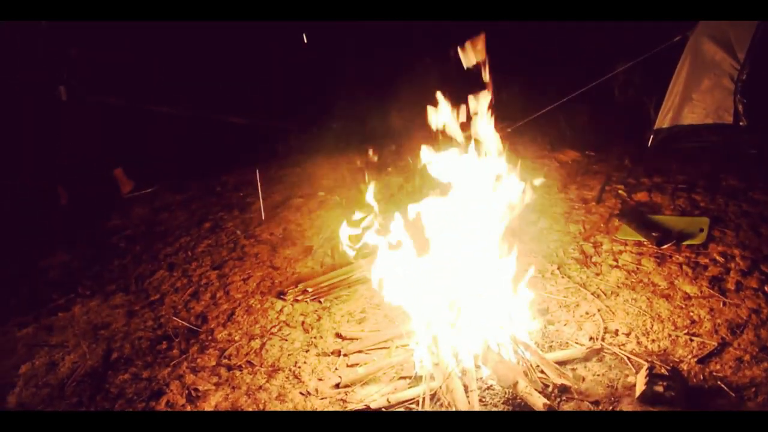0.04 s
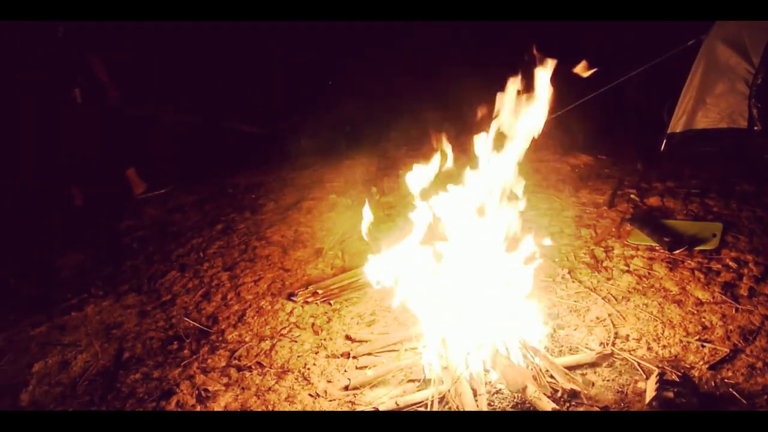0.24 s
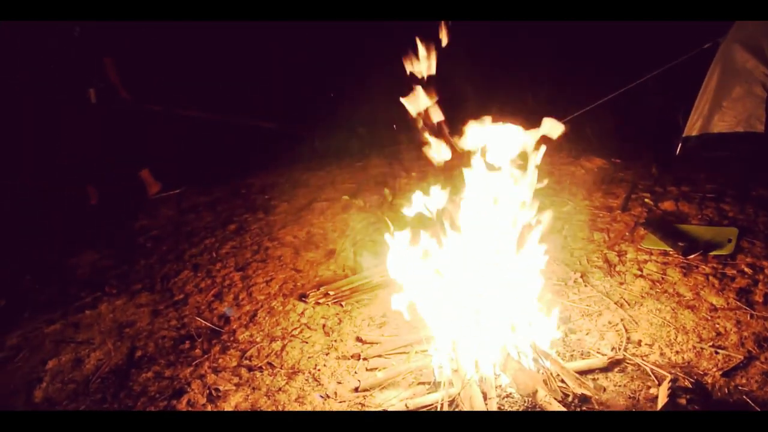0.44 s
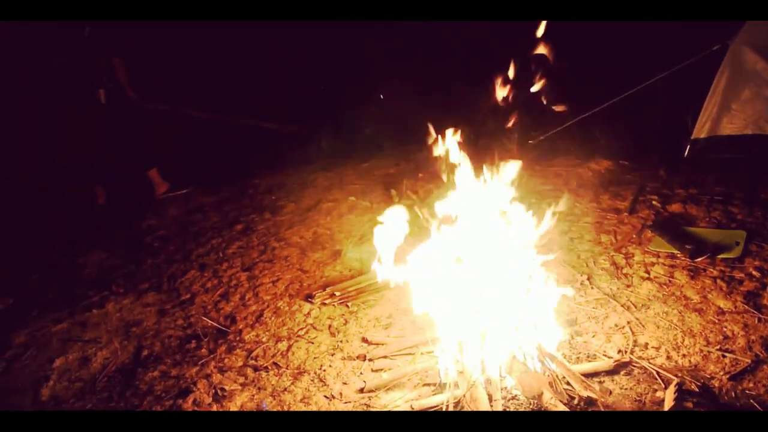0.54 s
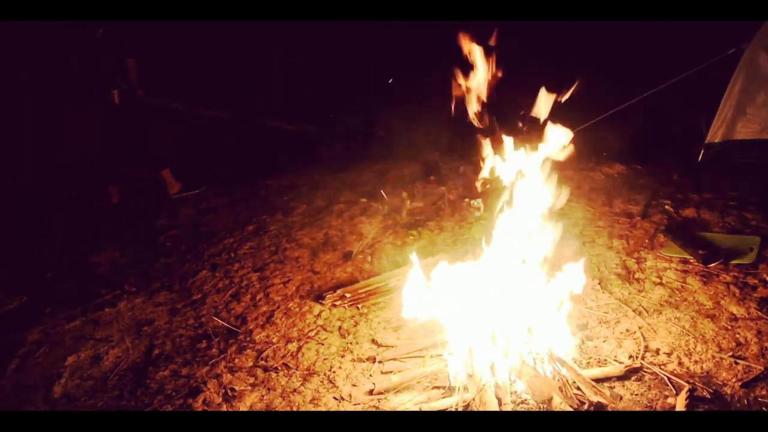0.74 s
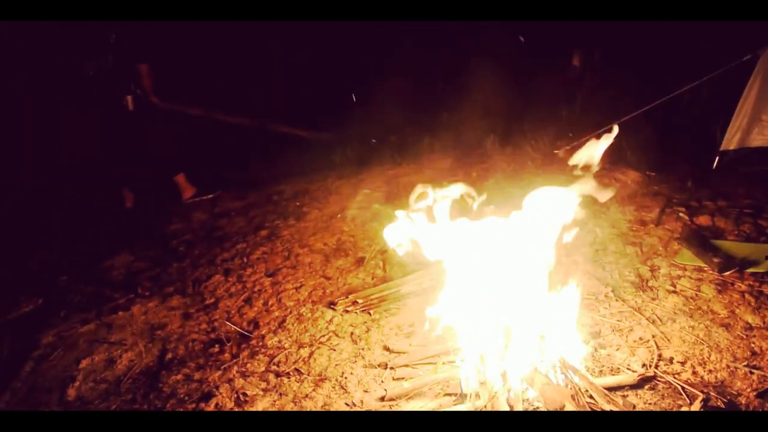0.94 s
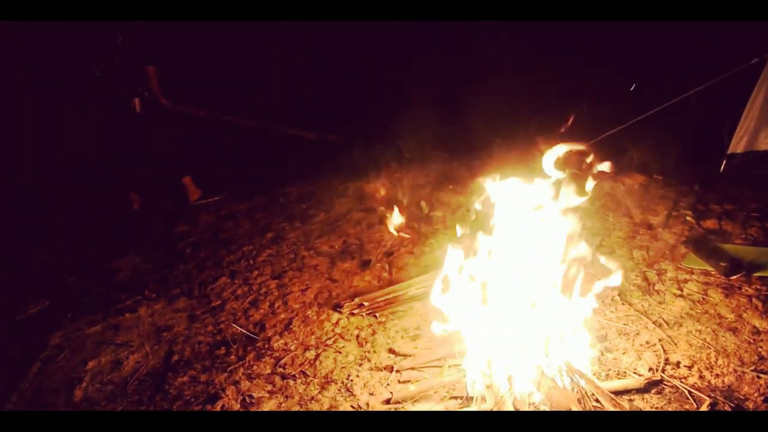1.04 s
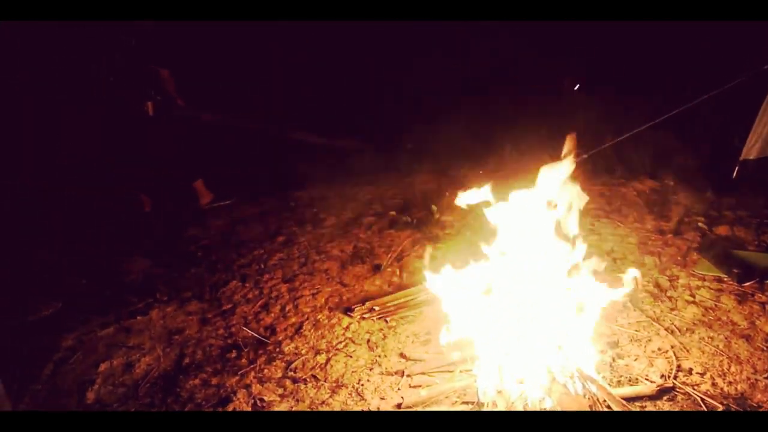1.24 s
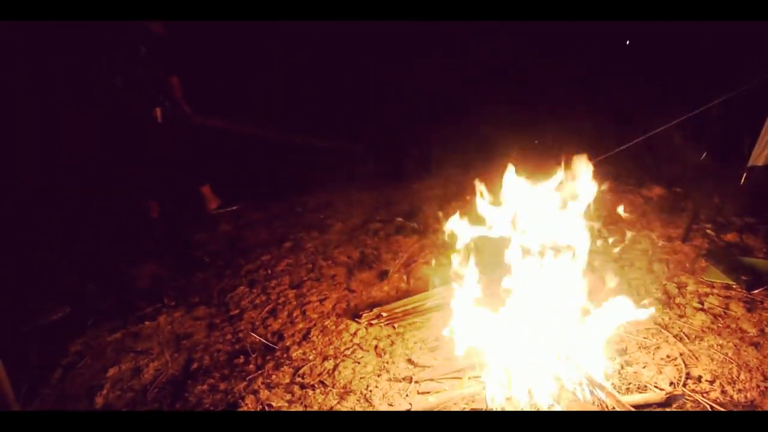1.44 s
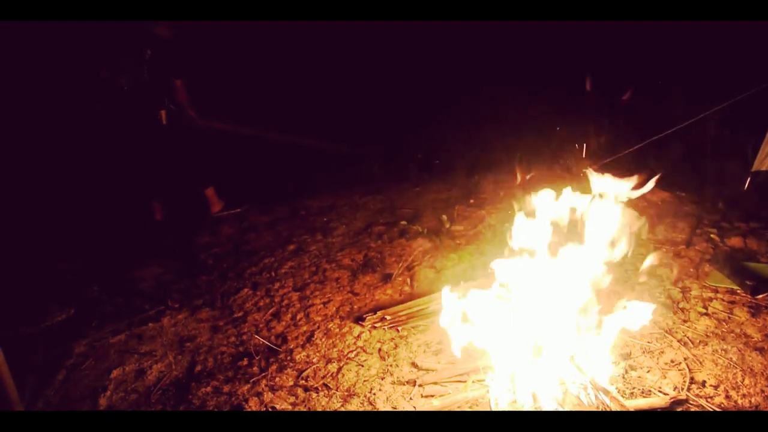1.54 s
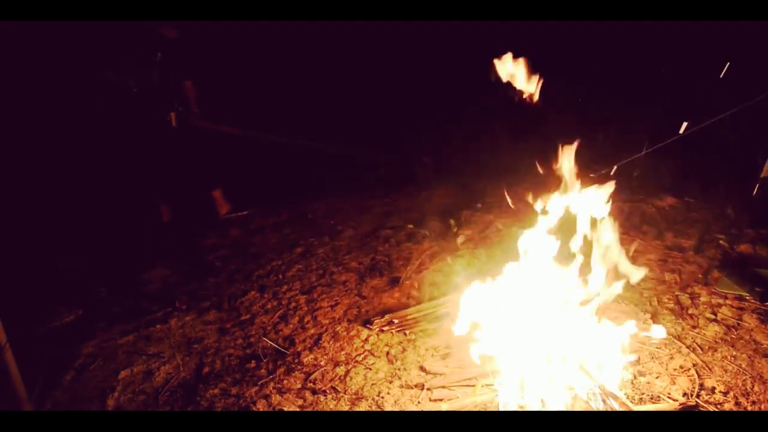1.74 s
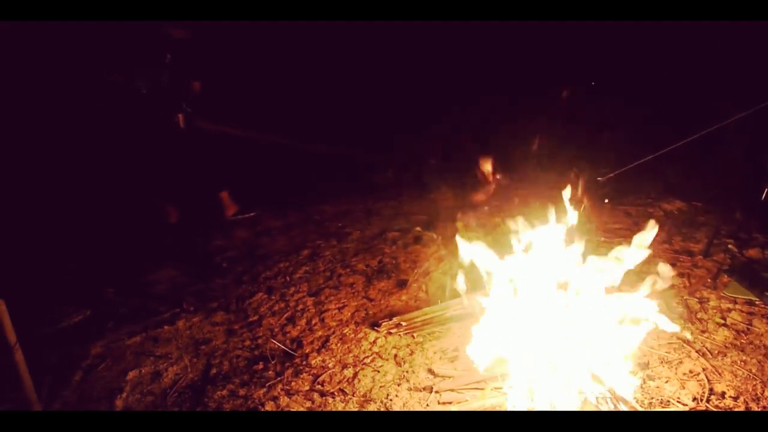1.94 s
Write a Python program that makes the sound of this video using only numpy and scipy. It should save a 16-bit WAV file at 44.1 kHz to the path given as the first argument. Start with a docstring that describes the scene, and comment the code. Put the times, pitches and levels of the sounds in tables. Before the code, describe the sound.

A campfire crackles up close, sap bursting with loud pops and steam spurts, insects trilling faintly behind

```python
"""A campfire at night, close to the microphone: a sap pocket bursts with a loud pop and a jet of steam, another follows.
Each burst or crack is decaying rings and shaped noise; steam, flames and sap hiss are coloured, patchy noise.
Flaring gas puffs, and tiny decaying sines tick through the hiss.
In the dark around the fire a cricket trills as a modulated sine, a chorus of insects swells and sinks
as banded noise, and a small night animal gives falling chirps. A faint noise tail answers the wood."""
import sys
import numpy as np
from scipy import signal
from scipy.fft import rfft, irfft, next_fast_len
from scipy.io import wavfile
from scipy.ndimage import uniform_filter1d, map_coordinates

SR = 44100
rng = np.random.default_rng(int(sys.argv[2]) if len(sys.argv) > 2 else 0)


def materialize(psi):
    """Save the field psi as 16-bit PCM at rate SR to the path in sys.argv[1].

    A 1-D psi becomes a single channel; in a 2-D psi each row is a channel.
    """
    bounded = np.clip(np.atleast_2d(psi).T, -1, 1)
    quanta = np.round(bounded * 32767).astype(np.int16)
    wavfile.write(sys.argv[1], SR, quanta)


N = 88200
T = np.arange(N) / SR
TOP_HZ = 15800  # band limit at the microphone


def amp(db):
    """Turn decibels into an amplitude factor."""
    return 10 ** (np.asarray(db) / 20)


def unit(x):
    """Scale to rms 1."""
    return x / np.sqrt(np.mean(x ** 2) + 1e-20)


def along(points, hz):
    """Read a curve of (Hz, value) points on a log frequency axis."""
    f, value = np.transpose(points)
    return np.interp(np.log(hz + 1), np.log(f + 1), value)


def shape(points):
    """Gain as a function of frequency, from (Hz, dB) points."""
    return lambda hz: amp(along(points, hz))


def band(centre_hz, q):
    """Gain of a resonant band around a centre."""
    return lambda hz: 1 / (1 + (q * (hz / centre_hz - centre_hz / (hz + 1))) ** 2)


def pan(db):
    """Left and right gains that differ by db; positive leans left."""
    return amp(np.array([[.5], [-.5]]) * db)


def fade(t, t60):
    """Exponential decay that loses 60 dB in t60 seconds."""
    return np.exp(-np.log(1000) * t / t60)


def wobble(rate):
    """A smooth random curve, rate knots a second."""
    return map_coordinates(rng.standard_normal(1000), [T * rate + 2], mode="wrap")


def filtered(x, response):
    """Multiply the spectrum of x by a response of frequency."""
    m = next_fast_len(x.shape[-1] * 5 // 4)
    hz = np.fft.rfftfreq(m, 1 / SR)
    return irfft(rfft(x, m) * response(hz), m)[..., :x.shape[-1]]


def low_cut(x, edge_hz):
    """Take away the bass below an edge."""
    sos = signal.butter(2, min(edge_hz, TOP_HZ), "high", fs=SR, output="sos")
    return signal.sosfilt(sos, x)


def add(out, s, x):
    """Mix x into out from time s."""
    part = out[:, round(s * SR):][:, :x.shape[-1]]
    part += x[..., :part.shape[1]]


# Left-right likeness of close sounds before the lean: pitch_hz, correlation
NEAR_LIKENESS = [(60, 0.91), (600, 0.94), (1400, 0.84), (3100, 0.08), (7000, 0)]
# Left-right likeness of sounds spread around the microphone, before the lean: pitch_hz, correlation
AROUND_LIKENESS = [(100, 0.74), (300, .45), (1400, 0.12), (3100, 0.11), (7000, -0.031)]
# How far noise leans left: pitch_hz, left_right_db
LEFT_LEAN = [(200, 1), (1500, 0.1), (4400, 1.5), (15000, 3)]


def rush(colour, alike, size=N):
    """Coloured stereo noise of rms 1; mid and side shares set the likeness, and the treble leans left."""
    def mid_and_side(hz):
        turn = np.arccos(np.clip(along(alike, hz), -1, 1)) / 2
        return colour(hz) * np.array([np.cos(turn), np.sin(turn)])

    mid, side = filtered(rng.standard_normal((2, size)), mid_and_side)
    left_right = np.array([mid + side, mid - side])
    return unit(filtered(left_right, lambda hz: pan(along(LEFT_LEAN, hz))))


def patchy(x, depth_db):
    """Uneven noise: the gain varies at random in small patches of time and pitch."""
    z = signal.stft(x, nperseg=1024)[2]
    field = rng.standard_normal(z.shape[1:])
    field = uniform_filter1d(field, size=3, axis=0)  # over pitch
    field = uniform_filter1d(field, size=4, axis=1)  # over time
    return unit(signal.istft(z * amp(depth_db * unit(field)), nperseg=1024)[1][:, :N])


BURST_S, THUMP_DELAY_S = .2001, 0.002626  # the log rings as it gives way
BURST_DB, BLAST_DB, BLAST_T60_S = -5.5, -2, 0.025
# Modes of the splitting log: pitch_hz, level_db (relative to BURST_DB), t60_s
LOG_MODES = [(226, -7.5, 0.033), (330, -10.5, 0.054), (605, -16.5, 0.042), (674, -12.5, 0.067),
             (845, -12, 0.035), (998, -3.5, 0.031), (1540, -4.5, 0.012), (2000, -12, 0.0097),
             (2270, -17.5, 0.017)]
# Colour of the blast: pitch_hz, level_db (relative)
BLAST_COLOUR = [(100, -37), (600, 6), (1300, -0.5), (1950, 15.5), (2400, 1), (3000, -1.5), (5000, 0),
                (11000, -3.5), (16000, -13)]


def burst():
    """A sap pocket splits the log with a sharp noise blast; a moment later the log's modes thump."""
    out, t = np.zeros((2, N)), T[:SR // 10]
    ring = np.zeros(len(t))
    for k, (hz, db, t60) in enumerate(LOG_MODES):
        sign = (-1) ** k
        ring += sign * amp(db) * np.sin(2 * np.pi * hz * t) * fade(t, t60)
    blast = rush(shape(BLAST_COLOUR), NEAR_LIKENESS, size=len(t)) * fade(t, BLAST_T60_S)
    add(out, BURST_S, amp(BLAST_DB) * blast)
    add(out, BURST_S + THUMP_DELAY_S, amp(BURST_DB) * low_cut(ring, edge_hz=130))
    return out


# Steam jets: start_s, level_db (before the unsteadiness), attack_s, hold_s (from the start),
# fade_db_per_s, colour as (pitch_hz, relative level_db)
STEAM_JETS = [(0.199, -14.5, 0.01, 0.074, 134.3, [(25, -37), (70, -22), (150, -14), (300, 0.5), (420, -4.5),
              (700, 3), (1300, 0), (2400, 4), (4500, 5), (6500, 1), (10500, 4.5), (13000, 1.5),
              (15800, -2)]), (0.404, -28, 0.0062, 0.028, 187, [(40, -27), (150, -2.5), (400, -5.5),
              (900, -12), (1800, -5.5), (3500, 5), (6000, -7), (10500, -8), (15800, -28)])]


def steam():
    """Steam jets from an opened pocket, holds, and dies as the pressure falls."""
    out = np.zeros((2, N))
    for s, db, attack, hold, fade_db, spectrum in STEAM_JETS:
        fall_db = fade_db * np.maximum(T - s - hold, 0)
        level = amp(db - fall_db + 0.3 * wobble(155))
        onset = np.sqrt(np.clip((T - s) / attack, 0, 1))
        out += onset * level * patchy(rush(shape(spectrum), NEAR_LIKENESS), depth_db=2.5)
    return out


SNAP_T60_S = 0.011  # averaged geometrically with each ring's t60
# Splinter noise: level over the ring's peak, t60 over the ring's; bass limit over the ring's pitch
SPLINTER, SPLINTER_LASTS, LOW_CUT = 0.33, 2.96, 0.47
# Cracks in the wood: start_s, level_db (before rise and low cut), ring pitch_hz, ring t60_s, rise_s,
# snap_db (over the ring), left_right_db (of the ring)
WOOD_CRACKS = [(0.0744, -9.5, 3850, 0.0032, 0.000034, -21.5, 0), (.4007, 2, 1200, 0.0073, 0.0006, -9.5, 2),
               (.4485, -13, 1040, 0.0087, .0005, -13, -0.5), (0.5349, -21, 2500, 0.0024, 0.000065, 1.5, 2),
               (0.5451, -12.5, 6200, 0.0022, 0.000081, -6.5, -13.5),
               (.5914, -24, 4050, 0.0014, 0.000086, -1, -1), (.6016, -17.5, 6900, 0.0015, 0.00007, 4.5, 2),
               (0.611, -21, 5900, .002, 0.000088, -4, 6), (.8755, -27, 1760, 0.023, 0.0017, 3.5, 1),
               (1.0212, -15, 2000, 0.0049, 0.000052, -15, 1.5), (1.0214, -17.5, 8470, 0.006, .0001, -14, 2),
               (1.0771, -26.5, 7860, 0.0018, 0.00011, 8, -3), (1.2944, -18.5, 7900, .002, 0.00009, -7, 3),
               (1.3700, -29.5, 1750, 0.021, 0.0011, 3, -2), (1.3882, -28.5, 1900, .007, .0002, 8.5, 3),
               (1.4285, -10, 2840, 0.0025, 0.000093, -21, -1),
               (1.4372, -17, 1620, 0.0078, 0.00065, -10, -1), (1.5147, -15.5, 846, 0.013, 0.0017, 4.5, 0),
               (1.5310, -0.5, 11650, 0.0017, 0.000078, -11.5, 9.5),
               (1.5446, -21, 13000, .003, .0001, -5, 3), (1.6290, -16, 3410, 0.021, 0.0019, -27, 1),
               (1.6305, -27.5, 1090, 0.015, 0.0011, 3, 4), (1.6613, -21.5, 9600, 0.0012, 0.00011, 5, -2),
               (1.8764, -17, 11200, 0.0025, 0.00011, -18, 4), (1.9000, -18.5, 7200, .003, 0.00016, 1.5, 12),
               (1.9804, -22.5, 9000, .002, .0001, -4, 1)]
# Colour of the bright snap: pitch_hz, level_db (relative)
SNAP_COLOUR = [(150, -5), (600, 4), (3200, 4), (7000, 0), (11000, -1), (16000, -4.5)]


def cracks():
    """Each fracture snaps brightly and rings a splinter for a few cycles; small splinters give no bass."""
    out, t = np.zeros((2, N)), T[:SR // 20]
    for s, db, hz, t60, rise, snap_db, pan_db in WOOD_CRACKS:
        ring = np.sin(2 * np.pi * hz * t) * fade(t, t60) * pan(pan_db)
        splinter = rush(band(hz, q=0.37), NEAR_LIKENESS, size=len(t))
        splinter *= SPLINTER * fade(t, t60 * SPLINTER_LASTS)
        snap = rush(shape(SNAP_COLOUR), NEAR_LIKENESS, size=len(t))
        snap *= amp(snap_db) * fade(t, np.sqrt(SNAP_T60_S * t60))
        onset = 1 - np.exp(-t / rise)
        add(out, s, amp(db) * low_cut((ring + splinter + snap) * onset, LOW_CUT * hz))
    return out


FLAME_DB, FLICKER_DB = -43.5, 1.8  # flicker per unit of wobble
# Colour of the flames before the roll-off around 4500 Hz: pitch_hz, level_db (relative)
FLAME_COLOUR = [(15, -45), (25, -11.5), (97, -2.5), (134, -4.5), (180, -0.5), (287, -3), (348, -3.5),
                (421, -8), (604, -3.5), (1120, -6), (1780, -7), (2620, -7.5), (4000, -5.5), (5200, -35),
                (8800, -120)]


def flames():
    """The soft rush of the flames is dark, patchy noise with a flickering level."""
    colour = lambda hz: shape(FLAME_COLOUR)(hz) / (1 + (hz / 4500) ** 8)
    level = amp(FLAME_DB + FLICKER_DB * wobble(10.23))
    return level * patchy(rush(colour, AROUND_LIKENESS), depth_db=2.5)


# Puffs of flaring gas: centre_s, level_db, width_s (standard deviation), centre pitch_hz
GAS_PUFFS = [(0.218, -23.5, 0.0059, 756), (0.287, -24, 0.0081, 640), (.293, -31.5, 0.01, 340),
             (0.844, -41.5, 0.0048, 465), (0.967, -38.5, 0.0073, 720), (1.03, -45, 0.047, 1730),
             (1.025, -45.5, 0.028, 133), (1.44, -42.5, 0.017, 1500), (1.532, -33.5, 0.023, 8900)]


def puffs():
    """Each short puff of flaring gas is a band of noise that swells and sinks."""
    out = np.zeros((2, N))
    for s, db, width, hz in GAS_PUFFS:
        swell = np.exp(-.5 * ((T - s) / width) ** 2)
        out += amp(db) * swell * rush(band(hz, q=0.88), NEAR_LIKENESS)
    return out


SAP_DB, SAP_WAVER_DB = -37, -0.53  # waver per unit of wobble
TICKS_PER_S, TICK_HZ = 70, 8000  # pitches scatter an octave either way, up to TOP_HZ
TICK_DB, TICK_SPREAD_DB = -32, 8  # the faintest tick, and the range above it, before panning
# Colour of the sap hiss: pitch_hz, level_db (relative)
SAP_COLOUR = [(2500, -11.5), (4200, -3.5), (6200, -3), (8000, -2), (10800, 5), (12500, -0.5), (14500, -6),
              (15800, -14)]


def sizzle():
    """Boiling sap hisses as bright noise; tiny decaying ticks are sprinkled through it."""
    hiss = patchy(rush(shape(SAP_COLOUR), AROUND_LIKENESS), depth_db=2.5)
    out = amp(SAP_DB + SAP_WAVER_DB * wobble(13.7)) * hiss
    t = T[:SR // 200]
    for when, size, pitch, side in rng.random((int(TICKS_PER_S * N / SR), 4)):
        hz = min(TICK_HZ * 4 ** (pitch - .5), TOP_HZ)
        db = TICK_DB + TICK_SPREAD_DB * size ** 2  # mostly faint
        tick = np.sin(2 * np.pi * hz * t) * fade(t, 9 / hz)  # nine cycles to -60 dB
        add(out, when * N / SR, amp(db) * pan(10 * side - 3) * tick)
    return out


CRICKET_HZ, CRICKET_WANDER_HZ = 4800, 45  # wander per unit of wobble
TRILL_HZ, TRILL_DEPTH = 43, .5  # rate before its phase wobbles, and share of the level
# Level of the cricket before its wobble: time_s, level_db
CRICKET_LEVEL = [(0, -58), (.6, -44.5), (.78, -46), (.9, -38), (.94, -51), (1.07, -42.5), (1.15, -49),
                 (1.33, -44), (1.6, -45.5), (1.87, -57), (2, -39)]


def cricket():
    """One cricket trills on a narrow wandering pitch, pulsing in level, a little to the left."""
    wander = np.array([wobble(70), wobble(70)])  # separate at left and right
    phase = 2 * np.pi * np.cumsum(CRICKET_HZ + CRICKET_WANDER_HZ * wander, axis=1) / SR
    trill = 1 + TRILL_DEPTH * np.sin(2 * np.pi * TRILL_HZ * T + wobble(12.7))
    level = amp(np.interp(T, *np.transpose(CRICKET_LEVEL)) + 2.5 * wobble(40))
    return level * unit(trill * np.sin(phase)) * pan(3)


# Falling chirps of a small night animal: start_s, level_db (before panning)
ANIMAL_CHIRPS = [(1.441, -40), (1.483, -36), (1.724, -37), (1.765, -37.5)]
CHIRP_HZ, CHIRP_FALL_HZ_PER_S, CHIRP_S = 5380, 52000, 0.024  # starting pitch, fall, length


def chirps():
    """Each chirp is one quick downward glide."""
    out, t = np.zeros((2, N)), T[:SR // 10]
    phase = 2 * np.pi * (CHIRP_HZ - .5 * CHIRP_FALL_HZ_PER_S * t) * t
    glide = np.sin(phase) * np.sin(np.pi * np.minimum(t / CHIRP_S, 1))
    for s, db in ANIMAL_CHIRPS:
        add(out, s, amp(db) * glide * pan(3.4))
    return out


CHORUS_REST_DB = -45.5  # between swells, before the wobble
# Swells of the chorus, added to the rest as power: centre_s, level_db, width_s (to 1/e of the power)
CHORUS_SWELLS = [(.13, -37.5, 0.026), (1.07, -41, .025), (1.245, -38.5, 0.056), (1.51, -37.5, 0.051),
                 (1.75, -39.5, 0.04), (1.965, -42.5, .025)]
# Colour of the chorus: pitch_hz, level_db (relative)
CHORUS_COLOUR = [(4000, -24), (4550, -6), (4850, 0), (5250, -0.5), (5550, -8), (6300, -89)]


def chorus():
    """The many insects behind merge into banded noise that comes in swells."""
    power = amp(CHORUS_REST_DB) ** 2
    for s, db, width in CHORUS_SWELLS:
        power = power + amp(db) ** 2 * np.exp(-((T - s) / width) ** 2)
    return np.sqrt(power) * amp(0.6 * wobble(130)) * rush(shape(CHORUS_COLOUR), AROUND_LIKENESS)


TREES_DB, TREES_T60_S = -12, .4


def trees(x):
    """Ground and trees scatter a faint tail back, a decaying noise response."""
    t = T[:SR // 2]
    tail = rng.standard_normal((2, len(t))) * fade(t, TREES_T60_S)
    return signal.fftconvolve(x, tail / np.linalg.norm(tail[0]), axes=1)[:, :N]


def scene():
    """The fire close by, the night around it; only the wood's cracks and burst echo off the trees."""
    wood = burst() + cracks()
    fire = wood + steam() + flames() + puffs() + sizzle()
    night = cricket() + chirps() + chorus()
    return fire + night + amp(TREES_DB) * trees(wood)


CLIP_LEVEL = 1.1  # ceiling of the soft overload


def record(dry):
    """The loudest pop overloads the recorder, which keeps nothing above its band limit."""
    clipped = dry / (1 + np.abs(dry / CLIP_LEVEL) ** 6) ** (1 / 6)
    return filtered(clipped, lambda hz: hz < TOP_HZ)


dry = scene()
out = record(dry)
materialize(out)
```